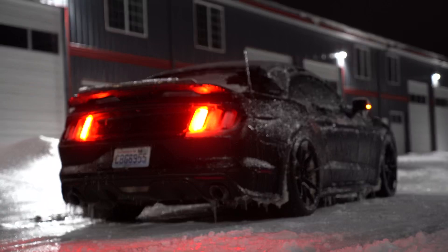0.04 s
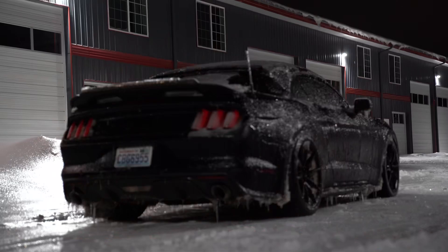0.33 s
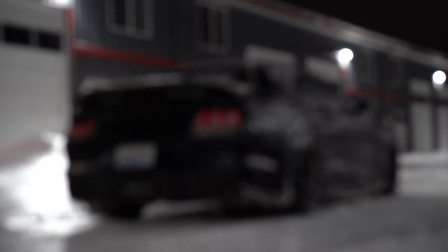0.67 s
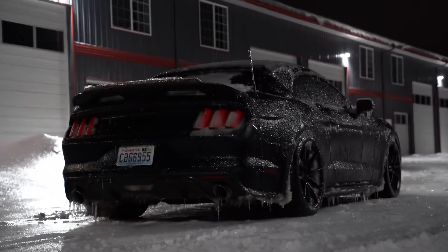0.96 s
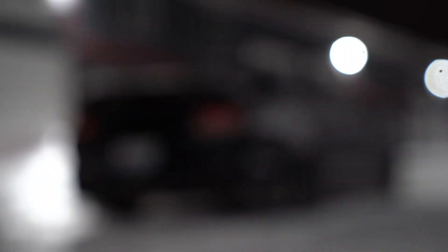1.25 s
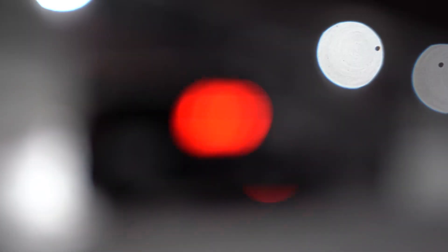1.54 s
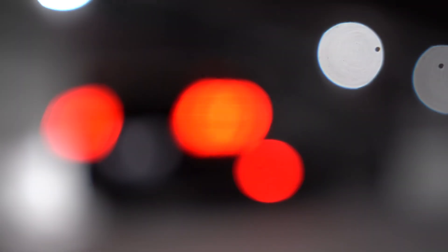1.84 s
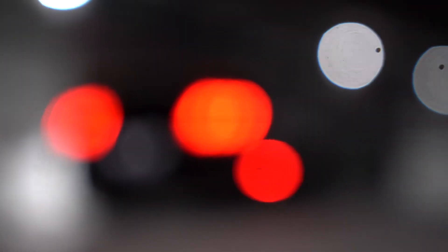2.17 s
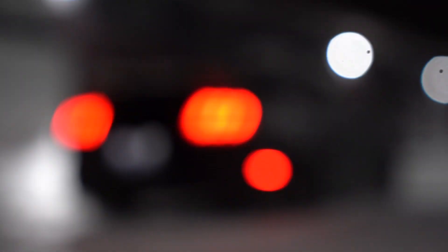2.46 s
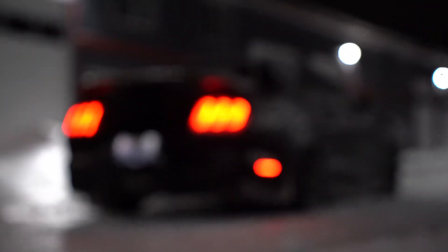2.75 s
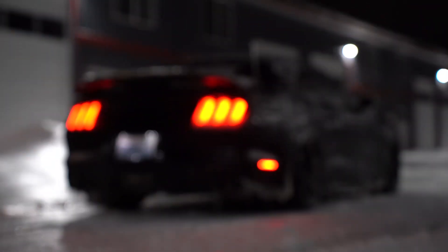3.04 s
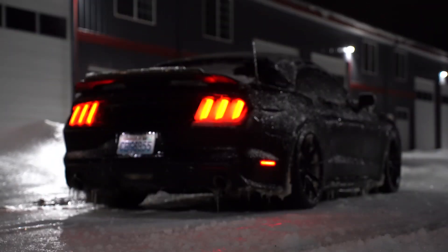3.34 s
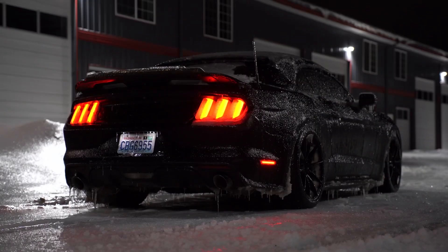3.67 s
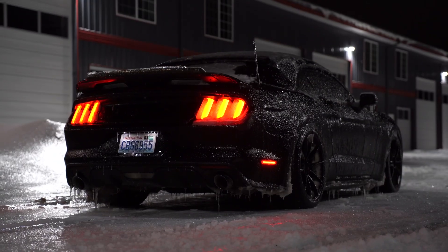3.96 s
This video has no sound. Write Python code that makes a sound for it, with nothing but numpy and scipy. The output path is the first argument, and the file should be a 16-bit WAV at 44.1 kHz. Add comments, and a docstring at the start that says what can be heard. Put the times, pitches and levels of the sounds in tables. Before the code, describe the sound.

A car starts up outdoors, its starter grinding before the exhaust rumbles into fast idle.

```python
"""Cold start of a V8 coupe outdoors on an icy night, heard from behind its twin tailpipes.
Faint ticks over a low background. At 0.6 s the starter clacks in and grinds through seven compressions.
At 1.5 s the engine catches with deep thumps, then flares with a crackling rasp as firings ring the pipes.
From 2.5 s it settles into a loud, lumpy fast idle. A nearby wall echoes throughout."""
import sys
import numpy as np
from scipy import signal
from scipy.fft import rfft, irfft
from scipy.io import wavfile

SR = 44100
rng = np.random.default_rng(int(sys.argv[2]) if len(sys.argv) > 2 else 0)


def generate_wav(sig):
    """Save sig (samples, or channels by samples) to the path in sys.argv[1] as 16-bit PCM at SR."""
    pcm = np.round(np.clip(np.atleast_2d(sig).T, -1, 1) * 32767).astype(np.int16)
    wavfile.write(sys.argv[1], SR, pcm)


N = 176400
T = np.arange(N) / SR
HZ = np.fft.rfftfreq(N, 1 / SR)

CATCH_S, SLOT_ZERO_S, SETTLE_FROM_S, SETTLE_TO_S = 1.565, 1.9463, 2.3, 2.5
JITTER_S, PUSH_SCATTER_DB, RASP_SCATTER_DB = .00005, .6, 2
PULSE_TOP_HZ, RING_DB, BOUNCE_S, BOUNCE_GAIN = 841, 0.62, 0.0017, 0.61
BOOM_HZ, BOOM_DECAY_S, BOOM_DB = 48.4, 0.021, -13.5
CLACK_S, CLACK_RISE_S, CLACK_DECAY_S, CLACK_DB = .615, 0.011, 0.026, -17.5
CUTOFF_HZ = 16000

# four-stroke cycle rate: time_s, rate_hz
ENGINE_SPEED = [(1.5, 7.5), (1.62, 11.36), (1.75, 12.34), (1.87, 12.74), (2.0, 12.96), (2.12, 12.88),
                (2.3, 12.47), (2.45, 11.72), (2.6, 11.28), (2.75, 11.11), (2.9, 10.98), (3.1, 11.05),
                (3.35, 11.07), (3.55, 11.1), (3.75, 10.97), (4.0, 11.02)]
# firing order: bank, flare_push_db, idle_push_db, flare_rasp_db, idle_rasp_db,
# flare_late_slots, idle_late_slots
FIRING_ORDER = [(0, -2.5, 4.5, -5, -2, .06, .16), (0, 1.5, 3.7, 2, 3, .11, .17),
                (1, 1.8, -1, -8, -2, .11, .08), (0, 2.6, 2.7, 0, -3, .11, .11),
                (1, 2.3, 2.1, -3, 0, .09, .17), (1, 4.5, .8, -5, -1, .03, .23),
                (0, 4, 3.5, 1, -1, .09, .18), (1, 2.1, 5.6, -8, -2, .05, .2)]
# resonances, one list per pipe: pitch_hz, width_hz, level_db, polarity
TAILPIPE_MODES = [
    [(87, 41, -20, 1), (155, 34, -20.1, 1), (200, 124, -15, -1), (239, 18, -24.6, 1), (327, 18, -30.1, 1),
     (345, 26, -21.4, 1), (484, 28, -18.5, 1), (561, 27, -17.9, 1), (675, 18, -29, -1),
     (756, 18, -34.7, -1)],
    [(79, 25, -27.7, 1), (154, 18, -23.1, 1), (193, 19, -30, 1), (242, 126, -24.4, -1), (297, 22, -16.7, 1),
     (393, 27, -27.1, -1), (504, 30, -16.9, 1), (570, 55, -17.2, 1), (618, 33, -17.4, -1),
     (710, 130, -25.9, -1)],
]
# gas turbulence: time_s, level_db
PUFF_LEVEL = [(1.55, -24), (1.72, -24), (1.8, -26), (2.25, -26), (2.45, -22), (2.7, -26), (2.9, -28.5),
              (4, -29)]
# turbulent puffs: freq_hz, gain_db
PUFF_SPECTRUM = [(21, -41), (45, -12.5), (100, -2.5), (170, -2), (240, 6.5), (320, -2), (420, -5.5),
                 (520, -1.5), (620, 0.5), (790, -0.5), (980, -29), (1130, -28.5), (2340, -77.5)]
# exhaust rasp: time_s, level_db
RASP_LEVEL = [(1.56, -22.5), (1.7, -29.5), (1.8, -30.5), (2.1, -30), (2.42, -32.5), (2.6, -33.5),
              (2.9, -34), (4, -32)]
# exhaust rasp: freq_hz, gain_db
RASP_SPECTRUM = [(530, -25), (900, 1), (1000, -16.5), (1130, 2.5), (1450, -4.5), (1610, 1), (1750, -9),
                 (2480, -14), (3180, -22), (3500, -18.5), (4180, -24), (4660, -30), (5770, -29),
                 (7150, -35), (15500, -57.5)]
# metallic engine rattle: time_s, level_db
RATTLE_LEVEL = [(1.5, -38.5), (1.8, -36.5), (2.5, -40.5), (3, -35), (4, -36)]
# metallic engine rattle: freq_hz, gain_db
RATTLE_SPECTRUM = [(500, -15.5), (1200, 14), (1700, 2), (3200, -19.5), (3550, -7.5), (4200, -1),
                   (4600, -9.5), (5000, -5), (6300, -9), (7300, -19), (15000, -51.5)]

# heavy firings: start_s, level_db
THUMP_HITS = [(1.500, -3.5), (1.520, 0), (1.540, -0.5), (1.559, -3.5), (1.574, -6), (1.603, -6),
              (1.666, -3.5), (1.740, -9), (2.403, -3.5), (2.447, -14)]
# heavy firings: freq_hz, gain_db
THUMP_SPECTRUM = [(20, -14.5), (48, -4.5), (125, 1.5), (200, -6), (550, -9.5), (900, -28.5), (1500, -22.5),
                  (6000, -69.5)]
# exhaust cracks: start_s, level_db
CRACK_HITS = [(1.5417, -16.5), (1.559, -14.5), (1.6635, -23), (1.778, -28), (1.7995, -10.5),
              (1.8285, -14.5), (1.8477, -18), (1.879, -13.5), (1.947, -15.5), (1.9555, -12), (2.0324, -19),
              (2.081, -19), (2.1104, -15.5), (2.1895, -16.5), (2.2377, -21.5), (2.2691, -24),
              (2.3175, -21.5)]
# exhaust cracks: freq_hz, gain_db
CRACK_SPECTRUM = [(600, -43.5), (1500, 14.5), (3100, -4.5), (3550, 3), (4400, -7.5), (6000, -20),
                  (15000, -42.5)]

# compressions loading the starter: start_s, length_s, grind_db, chuff_db
COMPRESSIONS = [(0.801, 0.17, -32, -30), (0.964, .10, -31, -23), (1.1, 0.09, -31, -28),
                (1.218, .065, -26.5, -33), (1.312, 0.07, -26, -45), (1.406, 0.06, -28, -40),
                (1.47, .12, -29, -21)]
# starter drive: time_s, gear_db, whine_hz, whine_db
STARTER_RUN = [(.61, -72, 1250, -29), (.63, -23.5, 1260, -33), (.78, -29, 1350, -33.5),
               (.9, -28.5, 1270, -29), (1.0, -30.5, 1330, -39), (1.15, -30.5, 1340, -29),
               (1.29, -30.5, 1320, -57), (1.34, -31, 1330, -29.5), (1.385, -30, 1300, -73),
               (1.425, -29.5, 1260, -21.5), (1.47, -29.5, 1250, -49), (1.54, -26.5, 1250, -42),
               (1.66, -53, 1250, -90)]
# hollow cranking hoot: time_s, pitch_hz, level_db
HOOT_TRACK = [(.62, 261, -73), (.65, 264, -22.5), (.69, 251, -69), (.725, 253.4, -25), (.79, 298.7, -26),
              (.835, 278, -22.5), (.87, 191.6, -35), (.92, 204.6, -29.5), (.97, 259, -48),
              (1.015, 276.5, -21), (1.065, 309.2, -40), (1.14, 350.7, -36.5), (1.19, 333.4, -32),
              (1.27, 350, -55), (1.35, 367, -32), (1.45, 373, -74)]
# hiss of the starter spinning free: time_s, level_db
SPIN_LEVEL = [(1.42, -57), (1.47, -28.5), (1.52, -44.5), (1.6, -64)]
# starter gears: freq_hz, gain_db
GEAR_SPECTRUM = [(210, -26.5), (350, 3.5), (410, -29), (458, -0.5), (738, -5), (811, 1.5), (1080, -8.5),
                 (1310, -1.5), (1790, -11), (2500, -8), (3220, -15), (6900, -18), (7450, -15.5),
                 (8000, -20), (15500, -33.5)]
# pinion impact: freq_hz, gain_db
CLACK_SPECTRUM = [(120, -49), (200, 7), (304, -21), (365, -43), (497, -31), (827, -8.5), (2560, -4),
                  (3070, -10), (7480, -8.5), (15500, -35)]
# loaded gears, free spin, pipe chuff: freq_hz, gain_db
GRIND_SPECTRUM = [(150, 3.5), (480, 4), (850, -1), (1050, -2), (1240, 13), (1400, 5), (1900, 1.0),
                  (2500, -14), (3300, -18), (7000, -10.5), (15000, -30)]
SPIN_SPECTRUM = [(1000, -34), (4400, 3), (8000, 1), (15000, -11)]
CHUFF_SPECTRUM = [(20, -27), (40, 8.5), (72, 11), (110, -15), (200, -9.5), (600, -61)]

# faint ticks: start_s, level_db
TICK_HITS = [(0.2121, -37), (0.2274, -36), (0.443, -38)]
# faint ticks: freq_hz, gain_db
TICK_SPECTRUM = [(1500, -34), (4000, -5), (7000, -1), (12000, -1), (16000, -4)]
# night background: freq_hz, gain_db
NIGHT_SPECTRUM = [(15, -61), (25, -4.5), (79, -6), (110, -3), (349, -7.5), (389, -19.5), (703, -14),
                  (3090, -35), (10100, -41.5), (15500, -54)]
# echo decay: freq_hz, t60_s
YARD_DECAY = [(60, 0.033), (500, 0.26), (2000, 0.36), (12000, 0.043)]
# left-right likeness of noise: freq_hz, correlation
COHERENCE = [(60, 1), (150, 1), (380, 0.98), (950, 0.78), (2380, 0.47), (5980, 0.42), (15000, 0.032)]
# stereo balance of the car: freq_hz, left_minus_right_db
BALANCE = [(60, -3.5), (130, -1.5), (290, -3.5), (640, -4.5), (1410, -1), (3100, -1.5), (6820, -3),
           (15000, -1)]


def exhaust():
    """Each firing rings its pipe with a puff and a rasp of gas; metal rattles along."""
    idle = np.clip((T - SETTLE_FROM_S) / (SETTLE_TO_S - SETTLE_FROM_S), 0, 1)
    fire_s, bank, push, rasp_gain = firings(idle)
    a, b = [pipe(impulses(fire_s, push * (bank == side)), modes) * (T > CATCH_S)
            for side, modes in enumerate(TAILPIPE_MODES)]
    spread = 0.1 * np.array([[1], [-1]]) * (a - b)
    ring = amp(RING_DB) * (a + b + spread)
    turbulence = unit(noise() * decay(impulses(fire_s, push), tau_s=0.006))
    puffs = colour(turbulence, PUFF_SPECTRUM) * level(PUFF_LEVEL)
    fronts = impulses(fire_s, rasp_gain)
    flare_gate = unit(bounce(decay(fronts, tau_s=0.0019)))
    idle_gate = unit(decay(fronts, tau_s=0.0083))
    gate = (1 - idle) * flare_gate + idle * idle_gate
    rasp = colour(noise() * gate * level(RASP_LEVEL) * amp(-1.5), RASP_SPECTRUM)
    rattle = colour(noise() * level(RATTLE_LEVEL) * .5 * (1 + gate), RATTLE_SPECTRUM)
    return yard(ring, wet_db=-22) + yard(puffs + rasp + rattle, wet_db=-11)


def firings(idle):
    """Eight uneven firings per cycle, blending from flare (idle = 0) to idle (1)."""
    cycles = np.cumsum(curve(ENGINE_SPEED)) / SR
    slots = (cycles - np.interp(SLOT_ZERO_S, T, cycles)) * len(FIRING_ORDER)
    slot = np.arange(np.ceil(np.interp(CATCH_S, T, slots)), slots[-1] - 1).astype(int)
    cylinders = np.array(FIRING_ORDER)[slot % len(FIRING_ORDER)].T
    bank, flare_columns, idle_columns = cylinders[0], cylinders[1::2], cylinders[2::2]
    blend = np.interp(slot, slots, idle)
    push_db, rasp_db, late_slots = flare_columns + blend * (idle_columns - flare_columns)
    scatter = rng.standard_normal((len(slot), 3)).T
    fire_s = np.interp(slot + late_slots, slots, T) + JITTER_S * scatter[0]
    push = amp(push_db + PUSH_SCATTER_DB * scatter[1])
    rasp_gain = amp(rasp_db + RASP_SCATTER_DB * scatter[2])
    return fire_s, bank, push, rasp_gain


def pipe(pulses, modes):
    """Gas pulses ring one pipe; the smooth pulses carry little treble."""
    age_s = T[:SR // 4]
    ring = sum(sign * amp(db) * np.exp(-np.pi * width_hz * age_s) * np.cos(2 * np.pi * hz * age_s)
               for hz, width_hz, db, sign in modes)
    return irfft(rfft(pulses) * rfft(ring, N) / (1 + (HZ / PULSE_TOP_HZ) ** 20), N)


def bounce(x):
    """A sharp front runs back and forth in the tailpipe."""
    return sum(BOUNCE_GAIN ** k * np.interp(T - k * BOUNCE_S, T, x) for k in range(4))


def thumps():
    """Heavy firings boom in the cold pipes."""
    blows = hits(THUMP_HITS)
    age_s = T[:SR // 4]
    mode = -np.sin(2 * np.pi * BOOM_HZ * age_s) * np.exp(-age_s / BOOM_DECAY_S) * amp(BOOM_DB)
    boom = signal.oaconvolve(blows, mode)[:N]
    front = -amp(-43.5) * decay(blows, tau_s=0.00047)
    gust = amp(-10.5) * noise() * decay(blows, tau_s=0.012)
    ring = amp(1.0) * pipe(blows * (T < CATCH_S), TAILPIPE_MODES[0])
    return boom + colour(front + gust, THUMP_SPECTRUM) + ring


def cracks():
    """Unburnt fuel cracks during the flare."""
    bursts = noise() * 1.58 * bounce(decay(hits(CRACK_HITS), tau_s=0.00098))
    return yard(colour(bursts, CRACK_SPECTRUM) * amp(-5), wet_db=-12.5)


def starter():
    """The pinion clacks in; gears grind and whine, harder at each compression, while the pipes chuff."""
    load, airflow = 0, 0
    for start_s, length_s, grind_db, chuff_db in COMPRESSIONS:
        arch = np.sin(np.pi * np.clip((T - start_s) / length_s, 0, 1) ** 0.46)
        load += arch * amp(grind_db)
        airflow += arch * amp(chuff_db)
    teeth = unit(amp(0.54 * drift(hz=217.3)))
    strain = 0.61 + .5 * load / load.max()
    gears = colour(noise() * teeth * strain * level(STARTER_RUN), GEAR_SPECTRUM)
    grind = colour(noise() * teeth * load, GRIND_SPECTRUM)
    whine = tone(curve(STARTER_RUN, column=2), wobble=0.025, wobble_hz=130)
    whine *= strain * level(STARTER_RUN, column=3) * (1 + 0.28 * drift(hz=90))
    hoot = tone(curve(HOOT_TRACK), wobble=0.03, wobble_hz=70) * level(HOOT_TRACK, column=2)
    age_s = np.maximum(T - CLACK_S, 0)
    impact = np.minimum(age_s / CLACK_RISE_S, 1) * np.exp(-age_s / CLACK_DECAY_S)
    clack = colour(noise() * teeth * impact, CLACK_SPECTRUM) * amp(CLACK_DB)
    spin = colour(noise() * level(SPIN_LEVEL), SPIN_SPECTRUM)
    chuff = colour(noise() * airflow, CHUFF_SPECTRUM)
    return yard(gears + grind + whine + clack + spin, wet_db=-11.5) + hoot + chuff


def yard(x, wet_db):
    """Adds scattered wall and ground echoes."""
    taps = rng.choice([-1., 1.], (2, SR // 2)) * (rng.random((2, SR // 2)) < 2000 / SR)  # 2000 echoes/s
    hz, delay_s, spectra = signal.stft(taps, SR, nperseg=256)
    fade = amp(-60 * delay_s / at_hz(YARD_DECAY, hz)[:, None]) * (delay_s > .004)
    tail = signal.istft(spectra * fade, SR, nperseg=256)[1]
    tail /= np.linalg.norm(tail[0])
    return x + amp(wet_db) * signal.fftconvolve(np.atleast_2d(x), tail, axes=1)[:, :N]


def night():
    """Low background with three faint ticks."""
    ticks = colour(noise() * decay(hits(TICK_HITS), tau_s=0.003), TICK_SPECTRUM) * amp(-4.5)
    fade_in = np.clip((T - .033) / 0.003, 0, 1)
    return colour(noise(), NIGHT_SPECTRUM) * amp(-37.5) * fade_in + ticks


def amp(db):
    return 10 ** (np.asarray(db) / 20)


def unit(x):
    return x / np.sqrt(np.mean(x ** 2) + 1e-20)


def at_hz(points, hz):
    freq_hz, values = np.transpose(points)
    return np.interp(np.log(hz + 1), np.log(freq_hz + 1), values)


def curve(rows, column=1):
    rows = np.array(rows)
    return np.interp(T, rows[:, 0], rows[:, column])


def level(rows, column=1):
    """Gain from a dB column; silent before the first row, dying after the last."""
    release = np.exp(-np.maximum(T - rows[-1][0], 0) / .05)
    return amp(curve(rows, column)) * (T >= rows[0][0]) * release


def colour(x, spectrum):
    """Minimum-phase filter of unit energy."""
    log_gain = np.log(amp(np.maximum(at_hz(spectrum, HZ), -100)))
    mirrored = np.r_[log_gain, log_gain[-2:0:-1]]
    response = np.exp(np.conj(signal.hilbert(mirrored)))[:len(HZ)]
    response /= np.sqrt(np.mean(abs(response) ** 2))
    taps = irfft(response, N)[:SR // 8]
    return signal.oaconvolve(x, taps[None], axes=1)[:, :N]


def noise():
    """Stereo white noise, less alike in the treble."""
    left, other = rfft(rng.standard_normal((2, N)))
    alike = at_hz(COHERENCE, HZ)
    return irfft(np.array([left, alike * left + np.sqrt(1 - alike ** 2) * other]), N)


def drift(hz):
    return unit(irfft(rfft(rng.standard_normal(N)) * np.exp(-(HZ / hz) ** 2), N))


def tone(pitch_hz, wobble, wobble_hz):
    cycles = np.cumsum(pitch_hz * (1 + wobble * drift(wobble_hz))) / SR
    return np.sqrt(2) * np.sin(2 * np.pi * cycles)


def impulses(times_s, sizes):
    return np.bincount(np.clip(np.round(times_s * SR).astype(int), 0, N - 1), sizes, N)


def hits(rows):
    start_s, level_db = np.transpose(rows)
    return impulses(start_s, amp(level_db))


def decay(x, tau_s):
    return signal.lfilter([1], [1, -np.exp(-1 / (SR * tau_s))], x)


def scene():
    """The car, slightly to the right, over the night background."""
    car = exhaust() + thumps() + cracks() + starter()
    balance = amp(np.array([[.5], [-.5]]) * at_hz(BALANCE, HZ))
    return irfft(rfft(car) * balance, N) + night()


def record(dry):
    """Full-scale clip, then low-pass."""
    lowpass = signal.firwin(511, CUTOFF_HZ, window=("kaiser", 9), fs=SR)
    return signal.oaconvolve(np.clip(dry, -1, 1), lowpass[None], "same")


dry = scene()
out = record(dry)
generate_wav(out)
```